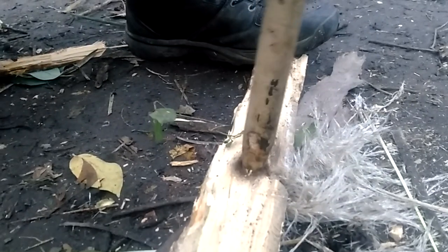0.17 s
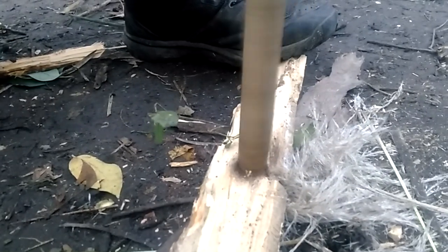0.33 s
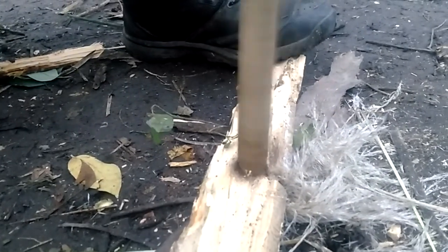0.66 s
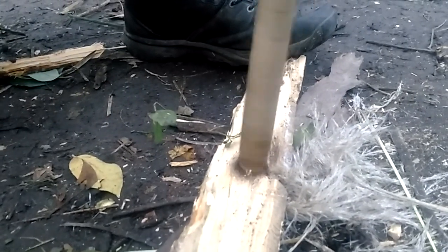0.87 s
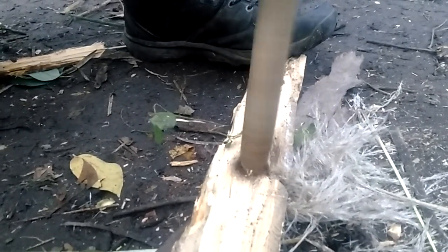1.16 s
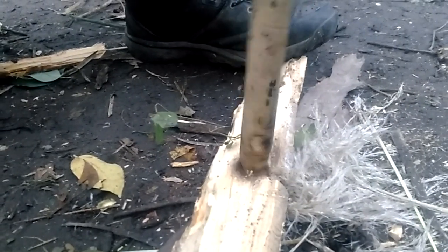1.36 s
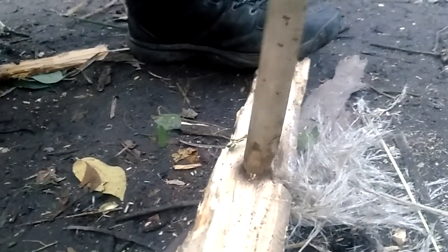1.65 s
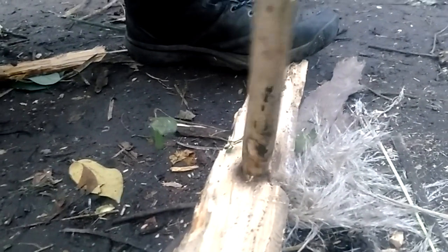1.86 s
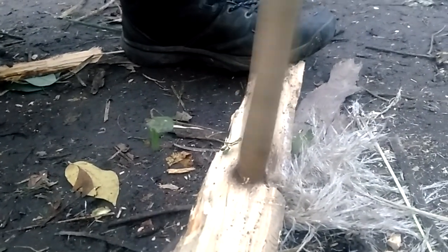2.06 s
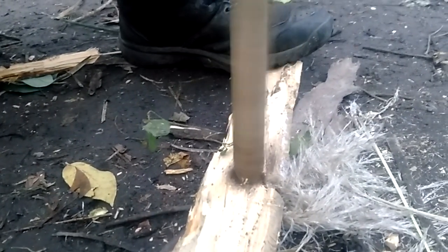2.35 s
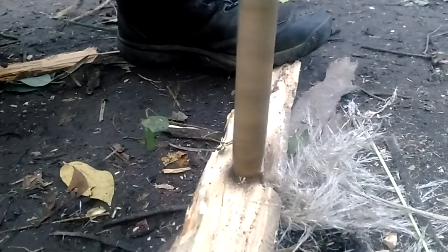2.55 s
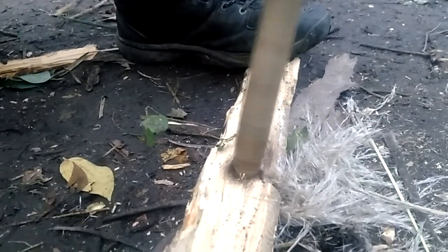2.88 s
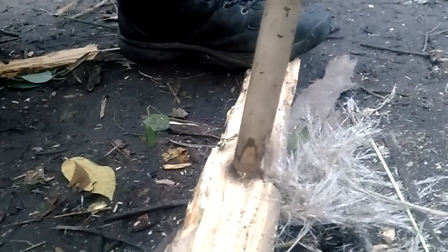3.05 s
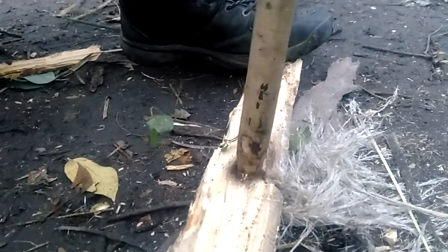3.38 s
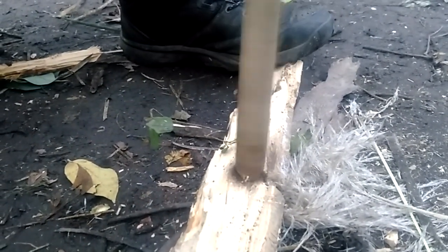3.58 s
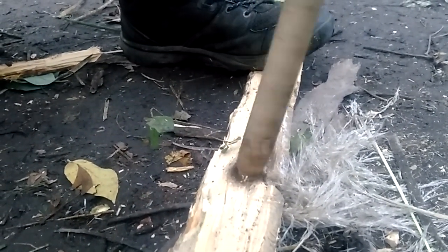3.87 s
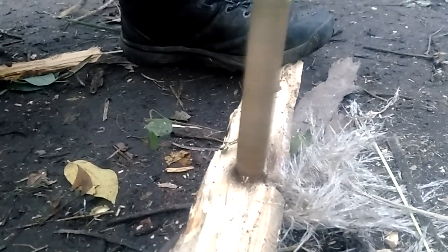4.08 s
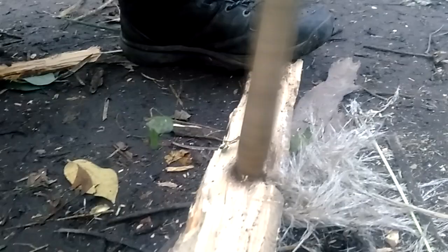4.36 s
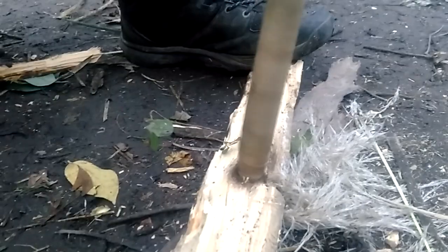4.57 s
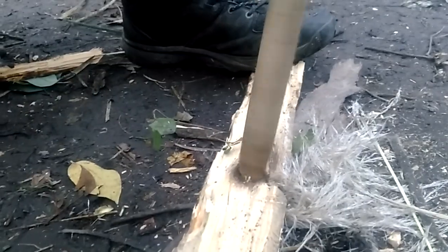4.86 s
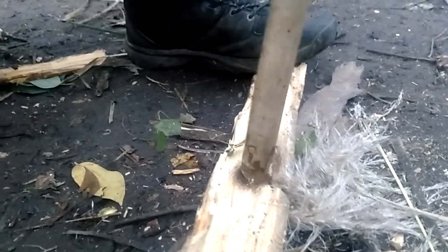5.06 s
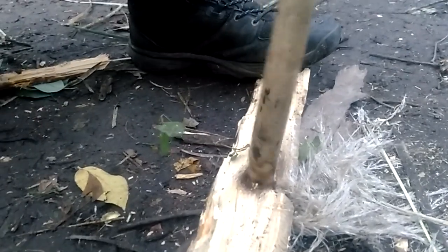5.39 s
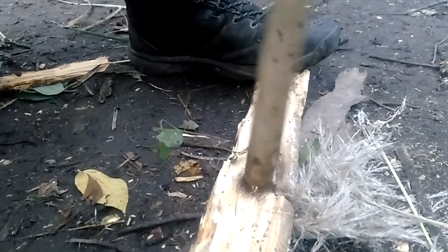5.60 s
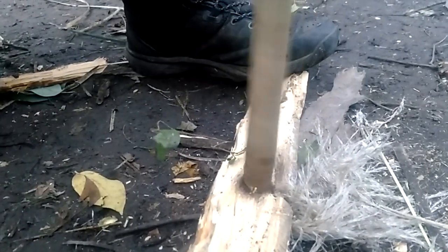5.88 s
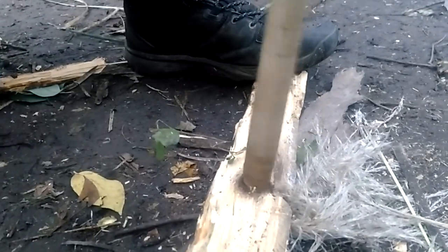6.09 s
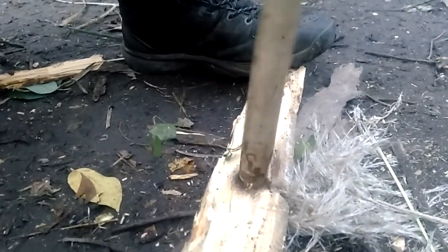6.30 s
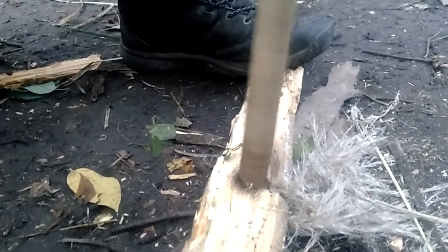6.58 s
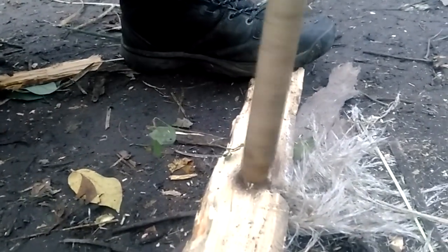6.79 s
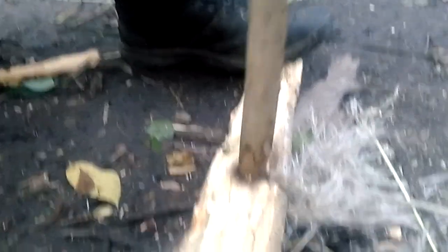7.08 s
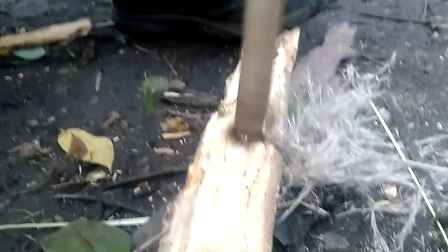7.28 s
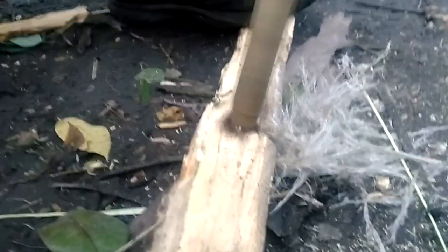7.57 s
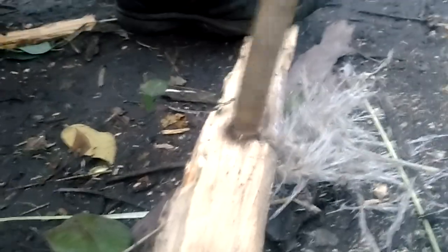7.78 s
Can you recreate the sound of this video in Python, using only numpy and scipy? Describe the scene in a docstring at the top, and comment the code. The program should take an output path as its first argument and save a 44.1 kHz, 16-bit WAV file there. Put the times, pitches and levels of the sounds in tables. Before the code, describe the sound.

A bow drill spins a wooden spindle in a dry board on bare earth outdoors. Quick, even strokes, three or four a second, each make a dry rasp that swells and stops as the bow turns. Short, high, rough squeaks ride on most strokes, some with a slight wooden groan. One sharp tick comes a little before halfway. The drill is close and straight ahead, with faint low bumps and still air behind.

```python
"""A bow drill spins a wooden spindle in the socket of a dry board, outdoors on bare earth.
Each bow stroke makes a rasp that swells with spindle speed. Near full speed the tip sticks and slips
in short squeaks: two wood resonances, an octave apart, lock together and the board is jolted.
The wood groans on hard strokes; cord and wood tick. Behind: rumble, bumps, a dull swish, still air."""
import sys
import numpy as np
from scipy import signal
from scipy.fft import rfft, irfft, next_fast_len
from scipy.io import wavfile
from scipy.ndimage import uniform_filter1d

SR = 44100
rng = np.random.default_rng(int(sys.argv[2]) if len(sys.argv) > 2 else 0)


def write(x):
    x = np.atleast_2d(x).T
    wavfile.write(sys.argv[1], SR, np.round(np.clip(x, -1, 1) * 32767).astype(np.int16))


N = 350065
TIME_S = np.arange(N) / SR

# Resonances of spindle and board. Each row: frequency in Hz, width in Hz, relative level in dB.
WOOD_MODES = [(398, 71, -6.5), (1001, 106, -2), (1604, 230, 1), (1826, 93, 3.5), (2680, 87, -4.5),
              (4110, 170, -4), (5990, 820, -7)]
# Spectrum of hiss and ticks. Each row: frequency in Hz, gain in dB.
HISS_SPECTRUM = [(300, -25.5), (750, -17.5), (1250, -4.5), (1800, -2.5), (2350, -16), (2800, -4),
                 (3700, -7), (4380, -1.5), (5200, -4), (6200, -2), (7000, -11), (7900, -22), (9600, -29.5),
                 (10600, -52)]


def rasp(speed, pressure, grind_db=-2.0, hiss_flutter_db=2.5, grind_flutter_db=2.0, wander_db=4.0):
    """Charred dust hisses in the socket; near full speed coarser catches ring the wood."""
    wobble = rms_one(drift(45) + drift(140))  # out-of-round tip varies the load
    hiss = rms_one(colour(grains(per_s=16000, spread_db=-1.16), HISS_SPECTRUM)) * speed ** 1.5
    catches = grains(per_s=1700, spread_db=2.0)
    grind = 0
    for hz, width_hz, db in WOOD_MODES:
        ringing = resonate(catches, [(hz, width_hz, 0)]) * np.sqrt(width_hz)
        grind += from_db(db + wander_db * drift(35)) * ringing  # contact wanders round the socket
    grind = rms_one(grind) * speed ** 2.09
    hiss *= from_db(hiss_flutter_db * wobble)
    grind *= from_db(grind_db + grind_flutter_db * wobble)
    return pressure * (hiss + grind)


def bow(fastest_share=0.54):
    """Spindle speed (0-1) and pressure (gain); the spindle stops at each turn of the bow."""
    # Pull and push in turn. Each row: start in seconds, end in seconds, full-speed level in dB.
    strokes = [(0.011, 0.293, -48), (0.343, 0.616, -44.5), (0.667, 0.895, -46.5), (0.942, 1.173, -44),
               (1.237, 1.428, -48), (1.507, 1.737, -44), (1.806, 2.016, -46.5), (2.075, 2.303, -45),
               (2.358, 2.591, -45.5), (2.662, 2.875, -43), (2.964, 3.204, -50), (3.278, 3.504, -47),
               (3.599, 3.806, -48), (3.861, 4.071, -47), (4.115, 4.344, -48), (4.392, 4.62, -48.5),
               (4.683, 4.885, -46), (4.932, 5.201, -47.5), (5.258, 5.486, -45), (5.535, 5.775, -44),
               (5.871, 6.105, -48), (6.185, 6.45, -47), (6.55, 6.815, -47.5), (6.895, 7.14, -44),
               (7.243, 7.517, -50), (7.585, 7.858, -43.5), (7.884, 8.12, -54)]
    start_s, end_s, db = np.transpose(strokes)
    fastest_s = start_s + fastest_share * (end_s - start_s)
    knots_s = np.maximum.accumulate(np.column_stack([start_s, fastest_s, end_s]).ravel())
    arm_speed = np.sin(np.interp(TIME_S, knots_s, np.tile([0, np.pi / 2, 0], len(strokes))))
    # Cord stretch softens each start and stop.
    speed = np.abs(uniform_filter1d(np.abs(arm_speed) ** 0.96, size=700))
    pressure = from_db(np.interp(TIME_S, fastest_s, db))
    return speed, pressure


def squeaks(jitter=0.03426, waver=0.03, shimmer_db=7.0, scrape_db=-10.0, chatter_db=-28.0):
    """The tip slips once per upper-partial cycle; with the lower partial, alternate slips are stronger."""
    # Spectrum of the slips and its low extension for the scrape. Each row: frequency in Hz, gain in dB.
    overtone_spectrum = [(2300, -5.5), (2860, 14), (3080, 3), (3300, -2.5), (3750, 7.5), (4050, -4.5),
                         (4370, 8), (4750, -4), (5400, -3.5), (5950, 1.5), (6900, -18.5), (7700, -22.5),
                         (9500, -39), (11500, -57)]
    scrape_lows = [(600, -27), (1300, -20)]
    (lower, upper, bite), pitch_hz, roughness = stick_slip()
    detune = roughness * (jitter * drift(900) + waver * drift(220))
    phase = np.pi * np.cumsum(pitch_hz * (1 + detune)) / SR  # lower partial, at half the pitch
    # Weak, rough bursts only chatter in the wood and never settle into a tone.
    strength = np.hypot(lower, upper)
    settled = strength / np.hypot(strength, from_db(chatter_db) * roughness + 1e-9)
    lock = settled * np.clip(2.8 * lower / (upper + 1e-9), 0, 1)
    chatter = grains(per_s=1500, spread_db=3.0)
    low_tone = blend(np.sqrt(2) * np.sin(phase), resonate(chatter, WOOD_MODES[1:2]), lock)
    high_tone = blend(np.sqrt(2) * np.sin(2 * phase), resonate(chatter, WOOD_MODES[2:4]), settled)
    tone = from_db(shimmer_db * roughness * drift(300)) * lower * low_tone
    tone += from_db(shimmer_db * roughness * drift(300)) * upper * high_tone
    # Sudden slips add overtones, odd ones only while the partials lock.
    overtones, power = 0, 1e-12
    for k in range(3, 13):
        gain = gain_at(overtone_spectrum, k * pitch_hz / 2) * (lock if k % 2 else 1)
        overtones += gain * np.sin(k * phase + rng.uniform(0, 2 * np.pi))
        power += gain ** 2 / 2
    puffs = rng.standard_normal(N) * (1 + np.cos(2 * phase))  # one per slip
    scrape = rms_one(colour(puffs, scrape_lows + overtone_spectrum))
    edge = blend(overtones / np.sqrt(power), scrape, settled)
    return tone + bite * (edge + from_db(scrape_db) * scrape)


def stick_slip(rise_share=0.43, glide_s=0.019, sag_hz=34.83, handover_db_per_hz=0.0307, bite_db=-10):
    """Overlapping squeaks drive one vibration: powers add, the strongest dominates the pitch."""
    # Each row: peak time in seconds, length in seconds, pitch in Hz, glide in Hz/s,
    # upper partial in dB, lower partial in dB.
    bursts = [(.136, .01, 1795, -4000, -23, -35), (.152, .018, 1622, -4000, -37, -50),
              (0.2, .02, 1880, -3000, -30.5, -35), (0.468, .014, 1710, -3000, -16.5, -45.5),
              (.488, .022, 1590, -5000, -23.5, -56.5), (0.526, .017, 1850, 8002, -18.5, -29),
              (.776, .022, 1700, -1000, -30.5, -44), (0.822, .017, 1930, -2000, -32.5, -31.5),
              (1.040, .015, 1900, 2000.5, -17.5, -23.5), (1.053, .013, 1890, 3500, -22.5, -27.5),
              (1.097, .014, 1671, 2001, -17, -32), (1.107, .021, 1820, 10997, -23.5, -27),
              (1.321, .017, 1630, -1000, -22.5, -48), (1.364, .015, 2040, 5000.5, -44, -39),
              (1.607, .021, 1650, -7000, -26, -47), (1.659, .015, 1800, 1502, -14.5, -26.5),
              (1.903, .011, 1660, -9000, -20.5, -50.5), (1.915, .014, 1550, -6000, -21, -58),
              (1.957, .018, 1780, 4999, -33.5, -42.5), (2.171, .013, 1690, -1500, -16, -38),
              (2.198, 0.038, 1540, 1001.5, -18, -44.5), (2.224, .017, 1700, 6501.5, -22, -28.5),
              (2.458, .016, 1670, -3000, -24.5, -40.5), (2.509, .017, 1980, 2999.5, -29, -28),
              (2.764, .013, 1677, -2000, -20.5, -45), (2.79, .027, 1560, -0.5, -19.5, -54),
              (2.816, .021, 1740, 11997, -19, -31.5), (3.064, .023, 1630, 3002.5, -42.5, -57.5),
              (3.369, .016, 2070, 6003, -36, -23.5), (3.447, .024, 2020, 3998, -34.5, -24.5),
              (3.684, .036, 1670, -3000, -42, -57.5), (3.743, 0.016, 1990, 8005.5, -48.5, -37),
              (3.95, .02, 1850, -4000, -25.5, -29.5), (3.973, .032, 1720, -5000, -20.5, -28.5),
              (3.994, .028, 1730, 2999, -22, -27.5), (4.22, .027, 1700, -2000, -31.5, -45.5),
              (4.272, .018, 1970, 5002.5, -31.5, -26.5), (4.509, .019, 1740, 8002.5, -29.5, -40),
              (4.556, .014, 1740, 9000, -15.5, -30), (4.574, .026, 1980, 7000, -31.5, -25.5),
              (4.764, .035, 1620, 2000, -41.5, -53.5), (5.024, .012, 1730, 5999, -17, -29.5),
              (5.036, 0.032, 1840, 2001, -25, -28.5), (5.086, .016, 1730, 5997.5, -17, -28.5),
              (5.101, 0.022, 1930, 8999, -30, -29), (5.183, .013, 1940, 3001, -50.5, -42.5),
              (5.37, .02, 1680, 4001, -41.5, -44), (5.416, .013, 1730, 2498, -41.5, -39),
              (5.644, .018, 1790, 1497.5, -18.5, -28.5), (5.693, .018, 1860, 1001, -16.5, -25.5),
              (5.922, .01, 1554, 2501, -42, -55), (5.976, .021, 1750, -3000, -34.5, -43.5),
              (6.046, .023, 1940, -5000, -43, -38.5), (6.278, .021, 1870, -5.5, -19, -24),
              (6.336, .018, 1740, 12001, -17, -30), (6.345, .026, 1900, 8500, -32, -28.5),
              (6.616, 0.032, 1650, 2500, -38, -49.5), (6.671, 0.016, 1680, -9000, -23, -53),
              (6.681, .018, 1580, -5500, -24.5, -72.5), (6.744, .022, 1710, 1.5, -39.5, -47),
              (6.999, .016, 1788, -1500, -17, -26), (7.057, 0.014, 1812, 8997.5, -16.5, -30),
              (7.067, .018, 1923, 8999.5, -29, -26), (7.355, .032, 1690, -3000, -42, -52),
              (7.43, .021, 1830, -5000, -46, -47), (7.667, 0.012, 1490, -2000, -12, -51.5),
              (7.682, .027, 1590, 4999, -19.5, -24.5), (7.715, 0.014, 1610, -500, -16, -26.5),
              (7.727, .009, 1590, -5000, -18.5, -28), (7.743, .038, 1680, -500, -31, -31.5),
              (7.776, .012, 1580, -3, -19.5, -27), (7.791, 0.02, 1780, 11000.5, -23, -29.5)]
    # Slips are sharpest at mid pitch. Each row: pitch in Hz, overtone gain in dB.
    bite_by_pitch = [(1500, -2), (1620, -1), (1730, 1.5), (1880, 0), (2080, -0.5)]
    # Low squeaks are ragged. Each row: pitch in Hz, roughness 0-1.
    rough_by_pitch = [(1500, .36), (1620, .35), (1750, .24), (1900, .18), (2080, .1)]
    # Faint squeaks are rougher. Each row: level in dB, added roughness.
    rough_by_level = [(-43.5, .2), (-28, .1), (-20, 0)]
    powers, weighted, weight = np.zeros((3, N)), np.zeros((2, N)), np.full(N, 1e-18)
    for peak_s, length_s, hz, glide_hz_per_s, upper_db, lower_db in bursts:
        span = slice(max(int((peak_s - 3 * length_s) * SR), 0), int((peak_s + 4 * length_s) * SR))
        age_s = TIME_S[span] - peak_s
        rise_s, fall_s = rise_share * length_s, (1 - rise_share) * length_s
        shape = swell(age_s, rise_s, fall_s)
        bend_hz = glide_hz_per_s * glide_s * np.tanh(age_s / glide_s)
        pitch_hz = hz + bend_hz + sag_hz * (1 - shape)
        upper = from_db(upper_db) * shape
        # Rising pitch feeds the lower partial, falling pitch starves it.
        lower = from_db(lower_db + handover_db_per_hz * bend_hz) * swell(age_s, rise_s, 1.1 * fall_s)
        # Bite is the overtone envelope: it comes later and leaves sooner than the partials.
        drive_db = upper_db + 0.2 * (lower_db - upper_db)
        bite = from_db(bite_db + 0.93 * drive_db) * gain_at(bite_by_pitch, hz) * shape ** 1.65
        bite *= (length_s / 0.017) ** 0.19  # overtones need time to build
        roughness = np.interp(pitch_hz, *np.transpose(rough_by_pitch))
        roughness += np.interp(max(upper_db, lower_db), *np.transpose(rough_by_level))
        power = lower ** 2 + upper ** 2
        powers[:, span] += np.array([lower, upper, bite]) ** 2
        weight[span] += power
        weighted[:, span] += power * np.array([pitch_hz, roughness])
    pitch_hz, roughness = weighted / weight
    return np.sqrt(powers), np.maximum(pitch_hz, 100), roughness


def knocking(squeal, gain_db=-56.5):
    """Jerks of the slipping tip jolt the board against the ground."""
    # Board lying on earth. Each row: frequency in Hz, width in Hz, gain in dB.
    board_modes = [(125, 50, 3.5), (211, 70, 9), (371, 22, -2)]
    force = np.sqrt(np.abs(uniform_filter1d(squeal ** 2, size=600)))
    return from_db(gain_db) * np.sqrt(force) * resonate(grains(per_s=190, spread_db=4.5), board_modes)


def groans(rise_s=0.019, fall_s=0.087):
    """Slow slipping under the load of a hard stroke rings a few narrow resonances."""
    # Each row: peak time in seconds, level in dB.
    peaks = [(.41, -55), (0.981, -60.5), (1.548, -49.5), (2.121, -51), (2.72, -50.5), (3.902, -49.5),
             (4.46, -49.5), (5.59, -56.5), (6.23, -55), (6.955, -51), (7.62, -73)]
    # Each row: frequency in Hz, width in Hz, gain in dB.
    groan_modes = [(1070, 170, 2.5), (1377, 53, -11), (2930, 220, -5), (4200, 290, -22), (6100, 300, -9.5)]
    envelope = sum(from_db(db) * swell(TIME_S - peak_s, rise_s, fall_s) for peak_s, db in peaks)
    return envelope * resonate(rng.standard_normal(N), groan_modes)


def ticks(decay_s=0.0097, gain_db=3.0):
    """Cord and wood give short, dry snaps."""
    # Each row: start in seconds, relative level in dB.
    snaps = [(3.3161, -29.5), (6.791, -43), (7.8834, -58), (7.898, -51), (7.9227, -52)]
    envelope = sum(from_db(db) * (TIME_S >= start_s) * np.exp(-np.abs(TIME_S - start_s) / decay_s)
                   for start_s, db in snaps)
    return from_db(gain_db) * colour(envelope * rng.standard_normal(N), HISS_SPECTRUM)


def scatter(x, near_db=-24.0, near_t60_s=0.05, far_db=-39.0, far_t60_s=0.36, dull_hz=2500):
    """Ground and legs scatter the sound at once; trees return a faint dull tail."""
    age_s = TIME_S[:SR]
    near, far = rng.standard_normal((2, SR)) * (age_s > 0.002)
    far = signal.sosfilt(signal.butter(2, dull_hz, fs=SR, output="sos"), far)
    echo = from_db(near_db) * rms_one(near * from_db(-60 * age_s / near_t60_s))
    echo += from_db(far_db) * rms_one(far * from_db(-60 * age_s / far_t60_s))
    return signal.fftconvolve(x, echo / np.sqrt(SR))[:N]


def rumble(floor_db=-65, lumps_db=3.5, rise_s=0.022, fall_s=0.055):
    """Lumpy low noise that swells where the board bumps the ground."""
    # Each row: peak time in seconds, level in dB.
    bumps = [(0.511, -53.5), (.82, -58), (1.05, -52), (1.25, -59), (1.5, -52.5), (1.62, -48.5), (1.8, -55),
             (2.191, -61.5), (2.78, -50.5), (3.25, -59), (4.12, -65), (4.35, -58.5), (5.121, -60),
             (5.669, -49.5), (5.9, -58), (6.12, -57), (6.44, -63), (6.62, -55), (6.899, -52.5),
             (7.05, -56.5), (7.739, -49.5)]
    # Each row: frequency in Hz, gain in dB.
    spectrum = [(15, -52), (25, -26.5), (59, 2.5), (81, 7), (210, -9.5), (287, -17), (330, -20), (430, -50),
                (730, -120)]
    coarse_s = TIME_S[::100]
    swells = [from_db(db) * swell(coarse_s - peak_s, rise_s, fall_s) for peak_s, db in bumps]
    envelope = np.interp(TIME_S, coarse_s, np.max(swells, axis=0))
    return shaped_noise(spectrum, 0) * np.hypot(from_db(floor_db + lumps_db * drift(15)), envelope)


def air(still_db=-72.0, swish_gain_db=-0.5):
    """A dull swish comes and goes over still outdoor air."""
    # Each row: time in seconds, level in dB.
    swish_levels = [(0.0, -79), (0.51, -82), (2.56, -74.5), (3.11, -83), (4.35, -68.5), (4.71, -78),
                    (6.61, -81.5), (6.85, -71), (7.19, -81.5), (7.94, -77.5)]
    # Each row: frequency in Hz, gain in dB.
    swish_spectrum = [(150, -30), (330, -6), (430, 0.5), (580, -0.5), (800, -10.5), (2000, -57)]
    still_spectrum = [(150, -41), (250, -5.5), (748, -7.5), (1020, -6.5), (1270, -7), (1810, -4),
                      (2400, -10.5), (2890, -9.5), (3380, -8), (6060, -8), (7500, -17), (9750, -55.5),
                      (16500, -120)]
    swish_db = swish_gain_db + np.interp(TIME_S, *np.transpose(swish_levels))
    return shaped_noise(swish_spectrum, swish_db) + shaped_noise(still_spectrum, still_db)


def grains(per_s, spread_db):
    """Wood fibres catch and snap at random, with uneven force; rms 1."""
    sizes = from_db(spread_db * np.minimum(rng.exponential(1, N), 5))
    return rms_one((rng.random(N) < per_s / SR) * sizes * rng.standard_normal(N))


def resonate(x, modes):
    """Parallel band-pass resonances; rms 1."""
    ringing = 0
    for hz, width_hz, db in modes:
        edges_hz = np.clip([hz - width_hz / 2, hz + width_hz / 2], 20, 0.45 * SR)
        band = signal.butter(2, edges_hz, "band", fs=SR, output="sos")
        ringing += from_db(db) * signal.sosfilt(band, x)
    return rms_one(ringing)


def swell(age_s, rise_s, fall_s):
    """Exponential growth, rounded peak at age 0, exponential decay."""
    return from_db(-20 * (np.hypot(1, age_s / np.where(age_s < 0, rise_s, fall_s)) - 1))


def blend(tone, noise, order):
    """Equal-power mix of tone (order 1) and noise (order 0)."""
    return order * tone + np.sqrt(1 - order ** 2) * noise


def drift(per_s):
    """Random line through per_s knots a second; rms 1."""
    knots = rng.standard_normal(N // 20)
    return rms_one(np.interp(TIME_S * per_s, np.arange(len(knots)), knots))


def shaped_noise(spectrum, db):
    """Noise of given spectrum and rms level."""
    return from_db(db) * rms_one(colour(rng.standard_normal(N), spectrum))


def colour(x, spectrum):
    """Filter by a (Hz, dB) table."""
    size = next_fast_len(N)
    hz = np.maximum(np.arange(size // 2 + 1) * SR / size, 1)
    return irfft(rfft(x, size) * gain_at(spectrum, hz), size)[:N]


def gain_at(spectrum, hz):
    """Gain of a (Hz, dB) table, interpolated in log frequency."""
    points_hz, db = np.transpose(spectrum)
    return from_db(np.interp(np.log(hz), np.log(points_hz), db))


def from_db(db):
    """Decibels to gain."""
    return 10 ** (np.asarray(db) / 20)


def rms_one(x):
    """Scale to rms 1."""
    return x / np.sqrt(np.mean(x ** 2) + 1e-20)


def scene():
    """Drill straight ahead; only its scattered treble has width."""
    # Side share of the scattered sound. Each row: frequency in Hz, gain in dB.
    side_spectrum = [(2800, -56), (4200, -19), (6000, -8.5), (8000, 5), (12000, 6.5)]
    squeal = squeaks()
    drill = rasp(*bow()) + squeal + knocking(squeal) + groans() + ticks()
    mid = drill + scatter(drill) + rumble() + air()
    side = colour(scatter(drill), side_spectrum)
    return np.array([mid + side, mid - side])


def record(dry):
    """Steep low-pass."""
    stopband_hz = 15444
    return signal.sosfilt(signal.cheby2(12, 70, stopband_hz, fs=SR, output="sos"), dry)


dry = scene()
out = record(dry)
write(out)
```